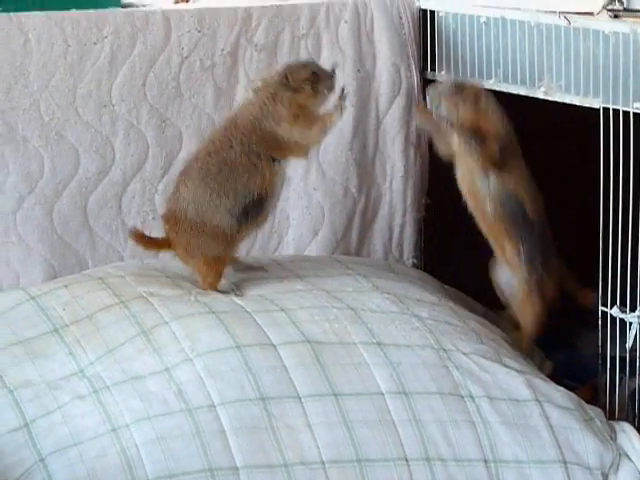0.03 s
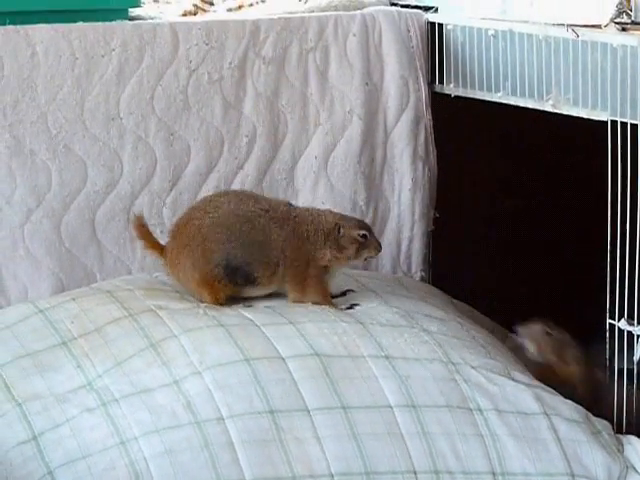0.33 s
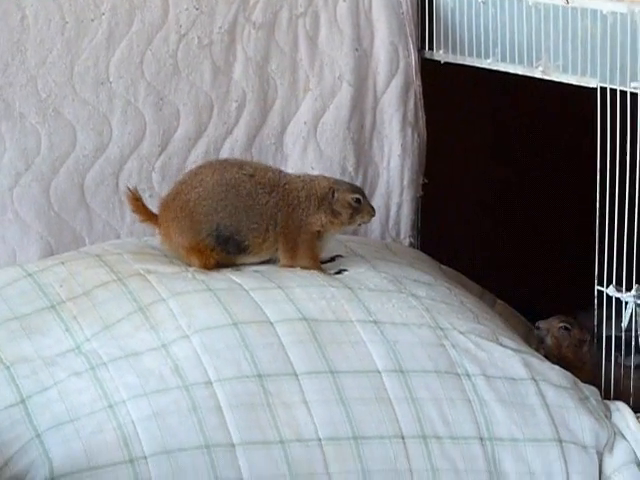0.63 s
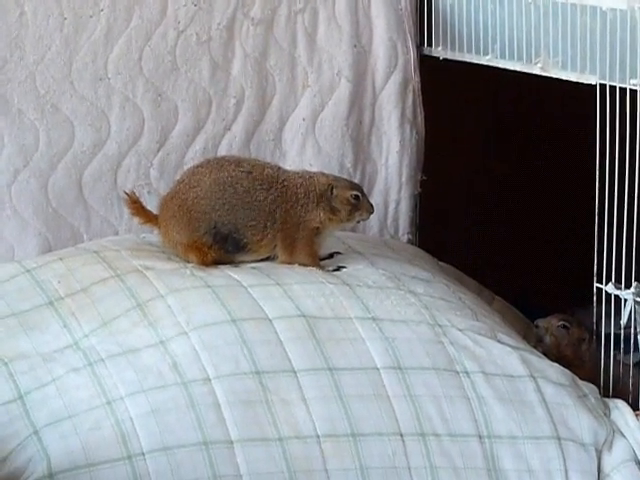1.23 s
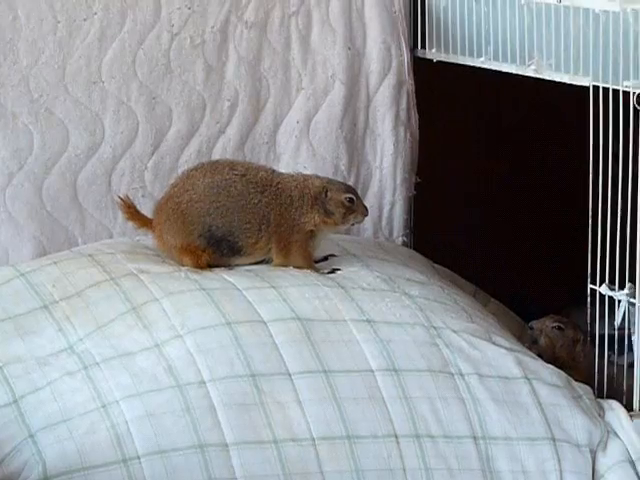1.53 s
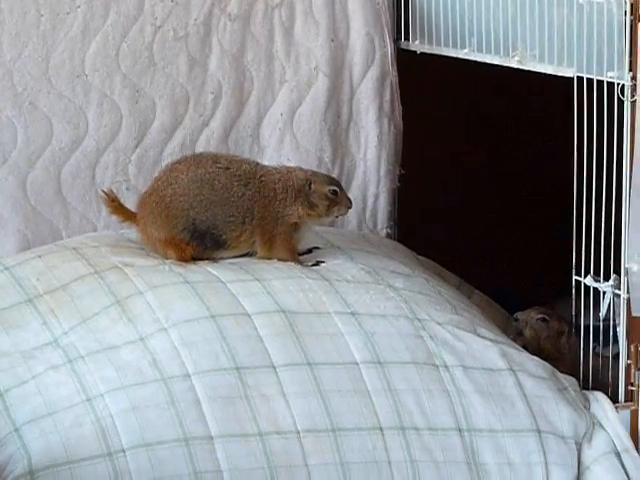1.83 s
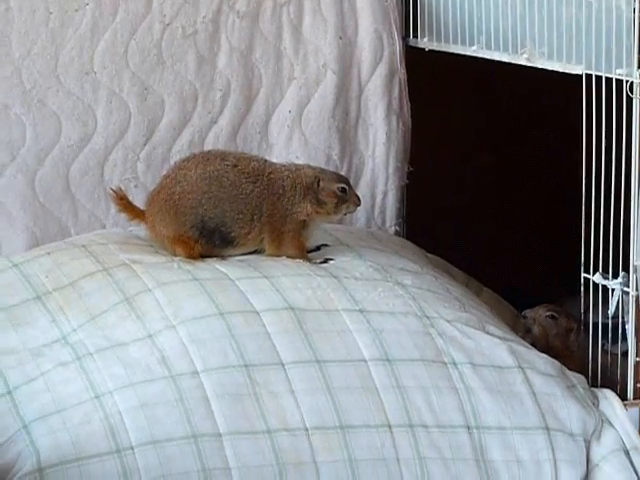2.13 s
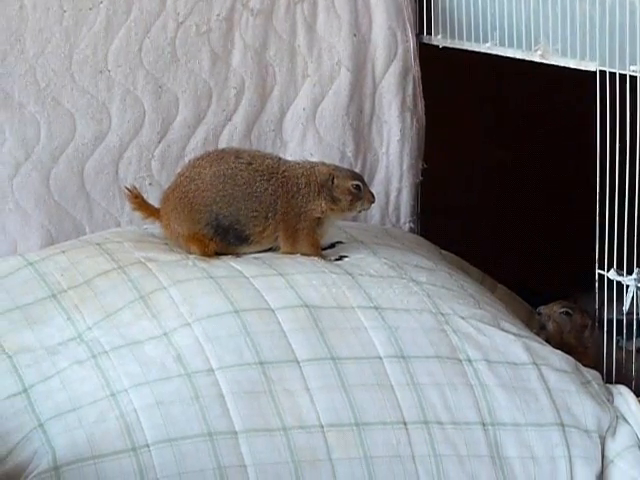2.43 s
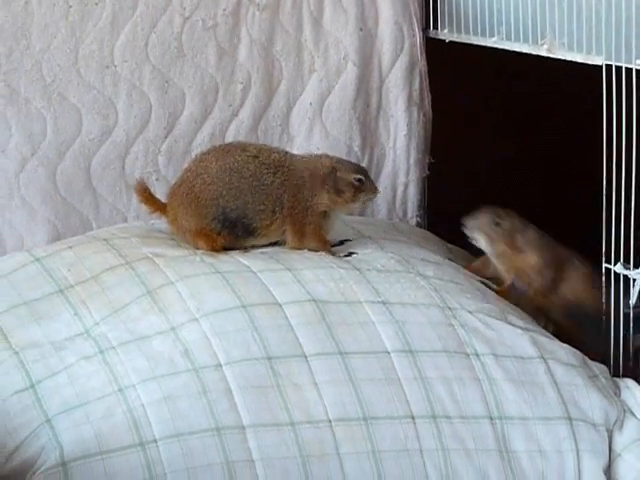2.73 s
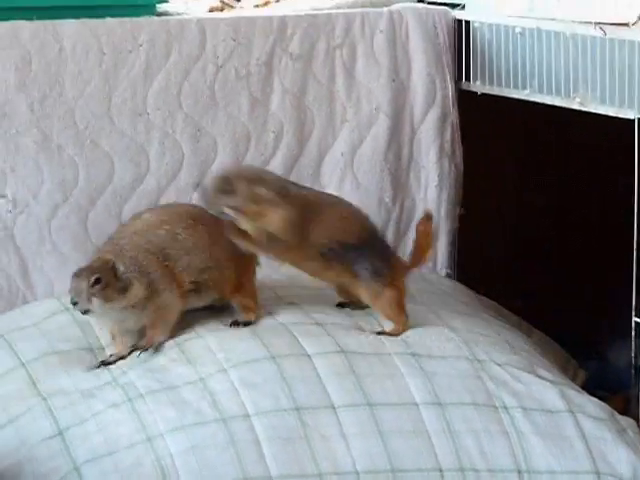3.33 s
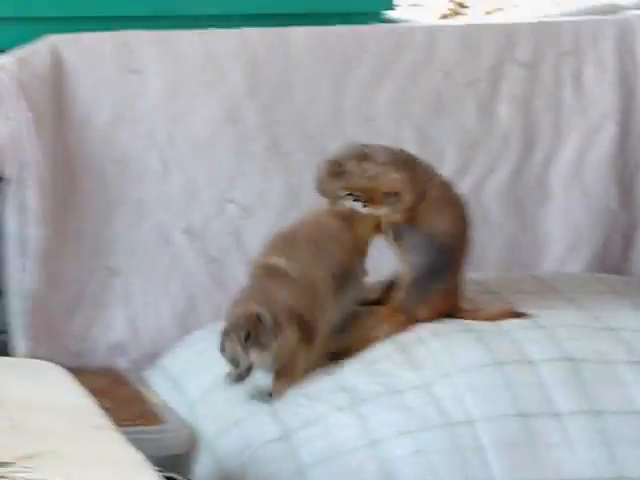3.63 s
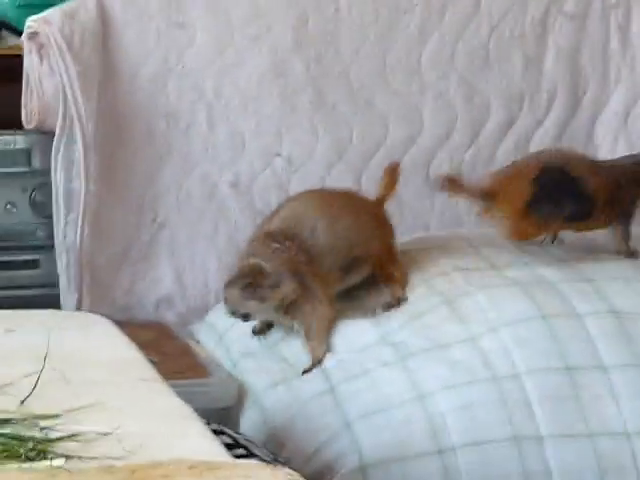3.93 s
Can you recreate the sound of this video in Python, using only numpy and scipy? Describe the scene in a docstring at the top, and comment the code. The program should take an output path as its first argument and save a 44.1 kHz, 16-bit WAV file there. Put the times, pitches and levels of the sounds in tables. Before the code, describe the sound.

A small animal yips sharply twice, following soft thumps and rustles on fabric indoors.

```python
"""A small, quiet room, where two prairie dogs tussle on a cushion. One drops onto its feet with a soft
thump; after a pause paws scuff and claws scratch over cloth in grainy bursts of noise. The scuffle
ends in two sharp yips, whistle-like voices that arch in pitch and ring off the walls. Room air and a
faint mains hum lie underneath, and a few narrow notches colour the treble."""
import sys
import numpy as np
from scipy import signal
from scipy.fft import rfft, irfft, next_fast_len
from scipy.io import wavfile
from scipy.ndimage import map_coordinates

SR = 44100
rng = np.random.default_rng(int(sys.argv[2]) if len(sys.argv) > 2 else 0)


def waveform_to_disk(signal):
    """Save audio, clipped to [-1, 1], as 16-bit WAV at the path in sys.argv[1]."""
    frames = np.transpose(np.atleast_2d(signal))
    scaled = np.clip(frames, -1, 1) * 32767
    samples = np.round(scaled).astype(np.int16)
    wavfile.write(sys.argv[1], SR, samples)


N = 176400
TIME = np.arange(N) / SR


def amp(db):
    """Decibels to gain."""
    return 10 ** (np.asarray(db) / 20)


def unit(x):
    """x at rms 1."""
    return x / np.sqrt(np.mean(x ** 2) + 1e-20)


def along(points, hz):
    """Read a curve of (frequency, value) points on a log frequency axis."""
    freqs, values = np.transpose(points)
    return np.interp(np.log(hz + 1), np.log(freqs + 1), values)


def wobble(rate_hz):
    """A smooth random modulator."""
    knots = rng.standard_normal(int(N * rate_hz / SR) + 4)
    return map_coordinates(knots, [TIME * rate_hz])


def filtered(x, response):
    """x through a complex frequency response."""
    size = next_fast_len(N + SR // 2)
    return irfft(rfft(x, size) * response(np.fft.rfftfreq(size, 1 / SR)), size)[:N]


def noise(colour, grain_db=0):
    """Coloured noise of rms 1; more grain_db makes it grittier."""
    grains = rng.standard_normal(N) * amp(grain_db * rng.standard_normal(N))
    return unit(filtered(grains, lambda hz: amp(along(colour, hz))))


def band(centre, half_width):
    """Noise of rms 1 in one resonance."""
    return unit(filtered(rng.standard_normal(N), lambda hz: 1 / (1 + ((hz - centre) / half_width) ** 2)))


def stroke(start, length, attack_s, t60):
    """An envelope that ramps up and, length seconds after its start, dies away."""
    t = TIME - start
    return np.clip(t / attack_s, 0, 1) * amp(-60 * np.maximum(t - length, 0) / t60)


# Mains hum (frequency [Hz], level [dB])
HUM = [(59.2, -69), (118.4, -75.5)]
# Narrow drones in the air (centre [Hz], half-width [Hz], level [dB])
DRONES = [(295.5, 9, -64), (508, 45, -75.5), (884, 39, -70)]
# Dark tone of the air (frequency [Hz], level [dB])
AIR = [(20, -8), (35, -17), (55, 2.5), (90, -6.5), (150, -6), (270, -1), (400, -5.5), (520, -2.5),
       (700, -7), (900, -6), (1150, -10.5), (1600, -16.5), (2200, -22), (3200, -23.5), (5000, -27.5),
       (6200, -24.5), (7500, -28), (8600, -52)]
def room_tone():
    """The bed: wavering mains hum, a few drones and gently drifting air."""
    hum = 0
    for hz, db in HUM:
        level = amp(db + 2.1 * wobble(4.91)) * np.sqrt(2)
        hum += level * np.sin(2 * np.pi * hz * TIME + .5 * wobble(6.05))
    drones = sum(amp(db) * band(hz, width) for hz, width, db in DRONES)
    air = amp(-57.5 + 1.13 * wobble(7.17)) * noise(AIR)
    return hum + drones + air


# Hiss cues (time [s], length [s], centre [Hz], half-width [Hz], level [dB])
HISSES = [(1.535, .035, 3010, 89.5, -74), (1.84, 0.034, 5600, 483, -63), (2.334, 0.038, 5950, 260, -71.5)]
def hisses():
    """Faint wisps of high noise while the animals wait."""
    return sum(amp(db) * stroke(start, length, attack_s=.012, t60=.17) * band(hz, width)
               for start, length, hz, width, db in HISSES)


def tick():
    """One faint, dry tick, like a claw touching the cage."""
    return amp(-61) * stroke(start=.92, length=0, attack_s=.001, t60=.025) * band(6000, 1700)


# Claw strokes (time [s], length [s], level [dB])
SCRATCHES = [(0.0, 0.038, -65.5), (0.111, 0.016, -63.5), (0.176, 0.034, -59), (0.206, 0.037, -54.5),
             (0.286, 0.037, -53.5), (.335, 0.034, -69), (0.397, 0.026, -66), (0.438, 0.014, -66),
             (1.51, 0.028, -69), (2.02, 0.027, -68), (2.872, 0.05, -67), (2.978, 0.024, -52.5),
             (3.037, 0.026, -69.5), (3.23, 0.034, -59), (3.275, 0.026, -60), (3.41, 0.037, -66),
             (3.522, 0.042, -64), (3.971, .03, -54.5)]
# Bright tone of claws on cloth (frequency [Hz], level [dB])
CLAW = [(500, -22), (1500, 2), (2300, -2), (3600, 2.5), (5000, 1), (6300, 3), (7400, -1.5), (8600, -32)]
def scratches():
    """Claws catch on threads in quick, uneven grains."""
    level = sum(amp(db) * stroke(start, length, attack_s=.0055, t60=.077)
                for start, length, db in SCRATCHES)
    return level * noise(CLAW, grain_db=5) * amp(2.8 * wobble(150) - 2)


# Paw and body rubs (time [s], length [s], level [dB])
SCUFFS = [(-.01, 0.037, -51), (0.179, 0.066, -58.5), (.278, .028, -54), (0.32, 0.068, -57.5),
          (.44, 0.073, -70), (1.509, 0.048, -59.5), (2.015, 0.044, -56.5), (2.861, 0.057, -55),
          (2.959, 0.046, -53), (3.05, 0.18, -65.5), (3.217, 0.029, -59.5), (3.236, .04, -55.5),
          (3.278, .048, -50), (3.434, 0.062, -60.5), (3.538, 0.041, -54), (3.574, 0.028, -57),
          (3.713, 0.058, -48), (3.794, 0.055, -52), (3.863, 0.037, -51), (3.945, 0.027, -49),
          (3.976, .03, -46.5)]
# Muffled tone of cloth (frequency [Hz], level [dB])
CLOTH = [(100, -8.5), (300, -3), (600, -0.5), (950, 0.5), (1400, -4), (2200, -16), (4000, -19.5),
         (8000, -34.5)]
def scuffs():
    """Paws and fur rub the cushion with a dull rustle."""
    level = sum(amp(db) * stroke(start, length, attack_s=.01, t60=.059) for start, length, db in SCUFFS)
    return level * noise(CLOTH, grain_db=7) * amp(1.86 * wobble(90) - 1.5)


# Footfalls (time [s], level [dB])
THUMPS = [(0.29, -48.5), (.33, -55), (0.37, -54.5), (0.406, -55), (0.456, -50.5), (.487, -61),
          (0.874, -54.5), (3.284, -58), (3.429, -51.5), (3.61, -58), (3.725, -52.5), (3.758, -56),
          (3.835, -52), (3.889, -53.5), (3.955, -55.5)]
# Bassy tone of the padding (frequency [Hz], level [dB])
CUSHION = [(30, -27), (90, -2), (170, -2.5), (280, -2.5), (450, -10), (1000, -16.5), (2500, -24),
           (8000, -59)]
def thumps():
    """Feet land on padding: a low puff without ring."""
    level = sum(amp(db) * stroke(start, .012, attack_s=.0015, t60=.086) for start, db in THUMPS)
    return level * noise(CUSHION)


def landing(start=.278, push_hz=217):
    """The full weight drops on the cushion: one low, quickly damped push and a slap of cloth."""
    push = np.sin(2 * np.pi * push_hz * (TIME - start)) * stroke(start, 0, attack_s=.0014, t60=.045)
    slap = amp(-10.5) * noise(CLOTH) * stroke(start, .0025, attack_s=.00073, t60=.025)
    return amp(-36) * (push + slap)


# Voice contours: a lead-in that runs into the first yip, then the second yip
# (time [s], pitch [Hz], partial 1 [dB], partial 2 [dB], partial 3 [dB], roughness [0-1])
LEAD_IN = [(3.586, 1385, -54, -65, -67, 0.79), (3.591, 1510, -39.5, -59.5, -51, 1),
           (3.595, 1730, -39, -42.5, -47, 0.52), (3.599, 1852, -36.5, -41, -29.5, .25),
           (3.604, 1908, -55, -45.5, -34, .1), (3.610, 1836, -46, -32.5, -45.5, .1),
           (3.615, 1900, -40.5, -45.5, -63, .3)]
FIRST_YIP = [(3.614, 2117, -55.5, -47, -42.5, 0.085), (3.617, 2170, -21, -30, -32, .1),
             (3.620, 2155, -27.5, -16.5, -21, 0.16), (3.6239, 2057, -24, -32, -23, 0.44),
             (3.627, 1872, -38.5, -19, -18.5, 1), (3.630, 1758, -44, -25, -22, 0.82),
             (3.635, 1630, -56, -32, -38.5, 0.8)]
SECOND_YIP = [(3.7622, 1695, -65, -45, -57, .05), (3.765, 1680, -41, -41, -25, .03),
              (3.7703, 1766, -42.5, -34, -17, .03), (3.774, 1755, -42.5, -22.5, -35, .08),
              (3.778, 1822, -42, -20.5, -24, .12), (3.782, 1842, -36, -24, -19, .2),
              (3.786, 1720, -43, -26.5, -38, .35), (3.791, 1490, -56, -39.5, -52, .45)]
# Upper partials (multiple of the pitch, level against the mean of the lower three [dB])
OVERTONES = [(4, -11.5), (5, -12)]
# How the mouth radiates the upper partials (frequency [Hz], gain [dB])
MOUTH = [(6500, 12), (7400, 3), (7800, -17.5), (8400, -35), (8750, -12.5)]
# Tone of the rasp (frequency [Hz], level [dB])
RASP = [(600, -27.5), (1400, -14.5), (2000, -15), (2500, -33), (3300, -4.5), (4200, -4.5), (5200, 2),
        (6500, -8.5), (7500, -13), (8400, -25), (9000, -36)]
def yip(contour, upper_db, jitter=.0216, rasp_db=-5.5, shimmer_db=1.5):
    """A whistle-like voice that arches in pitch; roughness shakes the pitch and adds a rasp."""
    times, hz, *levels_db, roughness = np.transpose(contour)
    inside_s = np.minimum(TIME - times[0], times[-1] - TIME)
    gate = np.clip(inside_s / .001 + 1, 0, 1)  # 1 ms fades
    pitch = np.interp(TIME, times, hz)
    rough = np.interp(TIME, times, roughness)
    shaken_pitch = pitch * (1 + jitter * rough * wobble(700))
    phase = 2 * np.pi * np.cumsum(shaken_pitch) / SR
    partials_db = [np.interp(TIME, times, db) for db in levels_db]
    effort_db = np.mean(partials_db, axis=0)
    partials_db += [effort_db + upper_db + db + along(MOUTH, k * pitch) for k, db in OVERTONES]
    voice = sum(amp(db) * np.sin(k * phase + 2 * np.pi * rng.random())
                for k, db in enumerate(partials_db, 1))
    pulses = 1 + np.cos(phase)  # one puff of rasp per cycle
    rasp = rough * amp(effort_db + rasp_db) * noise(RASP) * pulses
    return gate * np.sqrt(2) * (voice + rasp) * amp(shimmer_db * wobble(500))


# Reverb decay (frequency [Hz], time to fall 60 dB [s])
ROOM_DECAY = [(200, .22), (2000, 0.33), (4000, 0.29), (8000, 0.32)]
def room(x, echoes=14, first_s=.004, last_s=.024, tail_db=-3.5, walls_db=-7):
    """The direct sound, early reflections from near surfaces and a short diffuse tail."""
    hz, t, spectrum = signal.stft(rng.standard_normal(SR // 2), SR, nperseg=256)
    decay = amp(-60 * t / along(ROOM_DECAY, hz)[:, None])
    build_up = np.clip(t / (2 * first_s), 0, 1)
    tail = signal.istft(spectrum * decay * build_up, SR, nperseg=256)[1]
    spread = (np.arange(echoes) + rng.random(echoes)) / echoes
    delays = first_s + (last_s - first_s) * spread ** 2
    signs = rng.choice([-1, 1], echoes)
    walls = np.bincount((delays * SR).astype(int), signs, len(tail)) / np.sqrt(echoes)
    response = amp(tail_db) * tail / np.linalg.norm(tail) + amp(walls_db) * walls
    return x + signal.fftconvolve(x, response)[:N]


def scene():
    """The mono mix. The animals move between calls, so the room answers each differently."""
    first = yip(LEAD_IN, upper_db=2) + yip(FIRST_YIP, upper_db=-7)
    second = yip(SECOND_YIP, upper_db=1.5)
    calls = room(first) + room(second)
    tussle = room(scratches() + tick() + scuffs() + landing() + thumps() + hisses())
    return (calls + tussle + room_tone())[None]


# Treble notches (centre [Hz], width of one pass [Hz])
NOTCHES = [(2590, 306), (4600, 350), (5435, 150), (7900, 63), (8140, 40)]
def record(dry, top_hz=8900):
    """Two passes of narrow notches in the treble and a steep high cut."""
    def response(hz):
        notches = np.prod([(centre ** 2 - hz ** 2) / (centre ** 2 - hz ** 2 + 1j * hz * width)
                           for centre, width in NOTCHES], axis=0)
        high_cut = np.clip((top_hz - hz) / 200 + .5, 0, 1)
        return notches ** 2 * high_cut
    return filtered(dry[0], response)[None]


dry = scene()
out = record(dry)
waveform_to_disk(out)
```